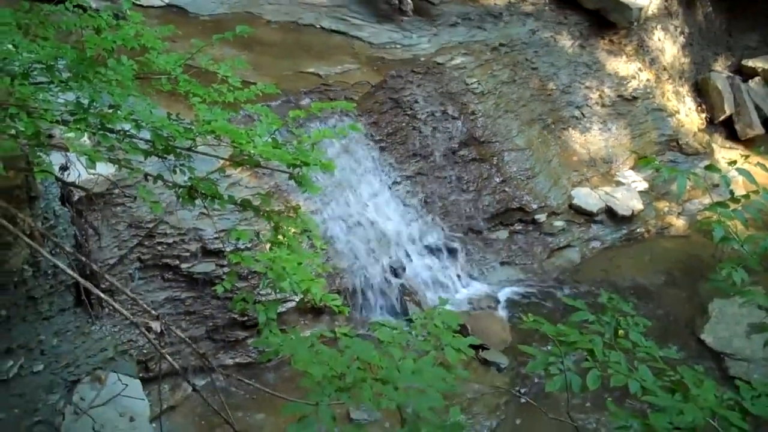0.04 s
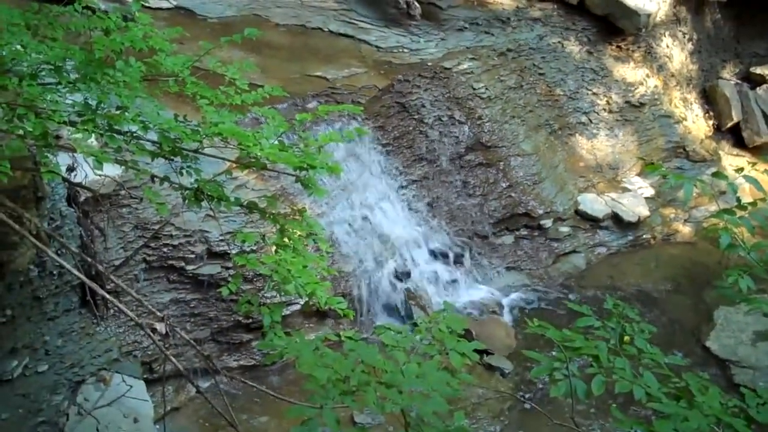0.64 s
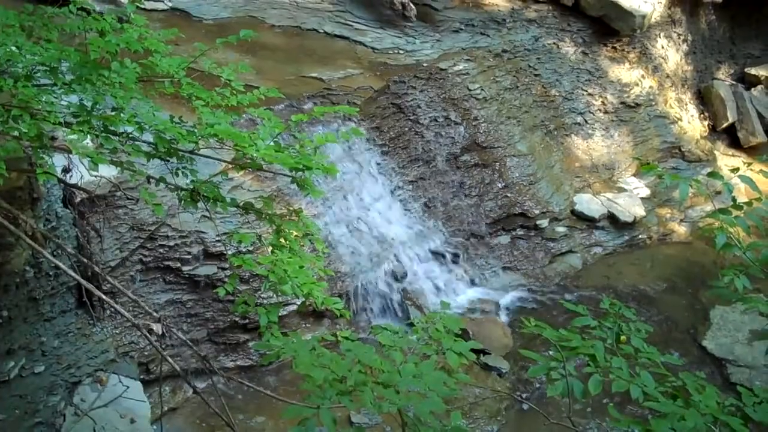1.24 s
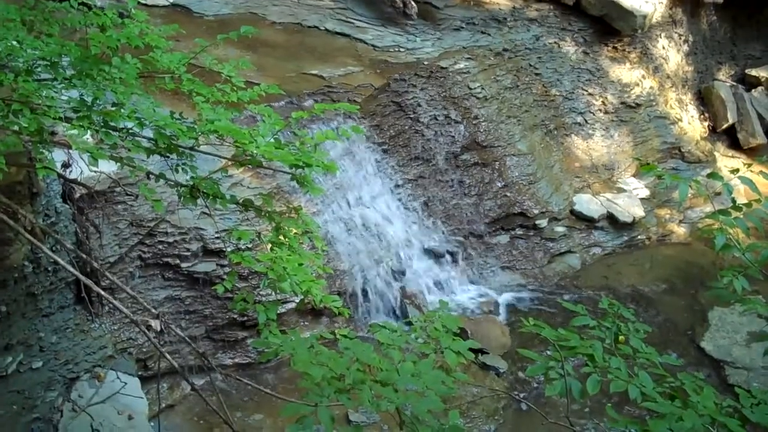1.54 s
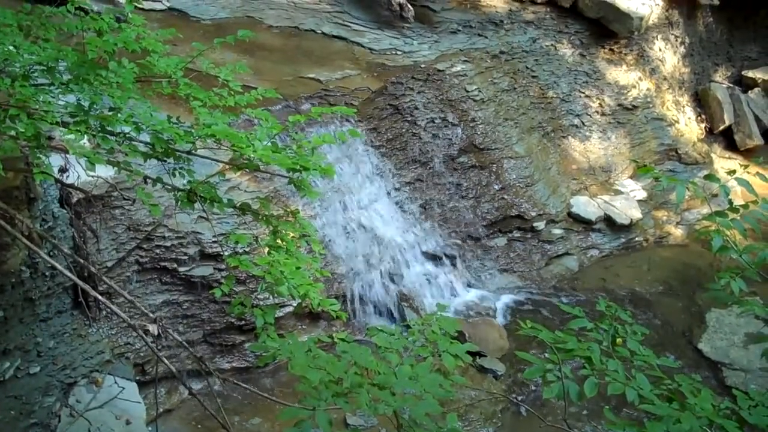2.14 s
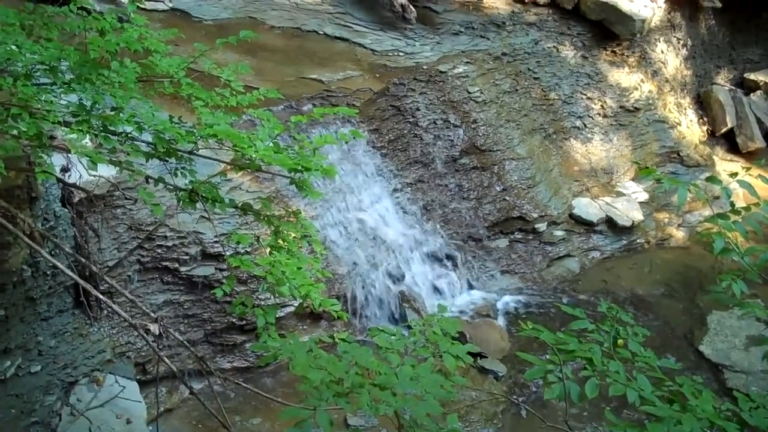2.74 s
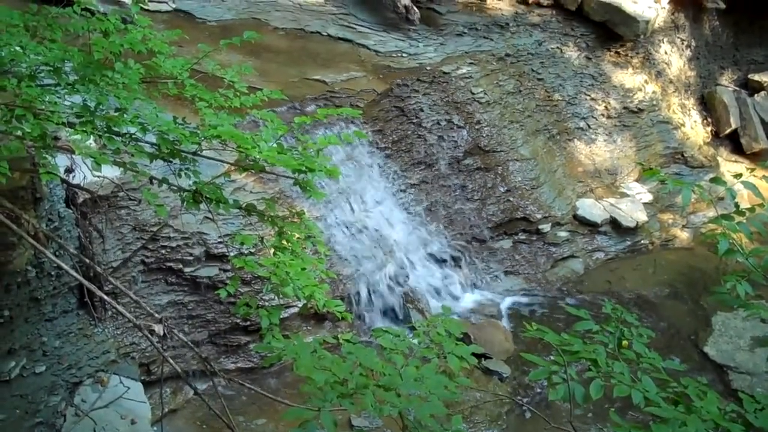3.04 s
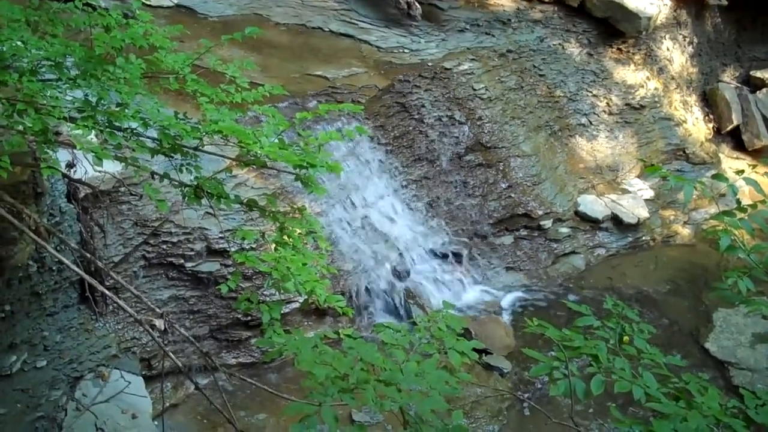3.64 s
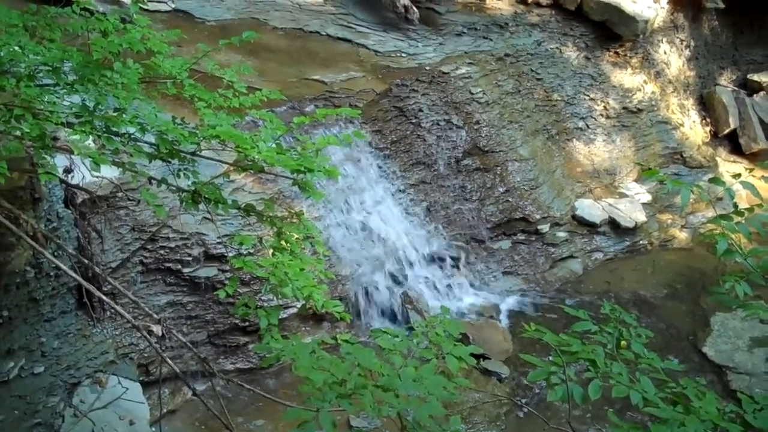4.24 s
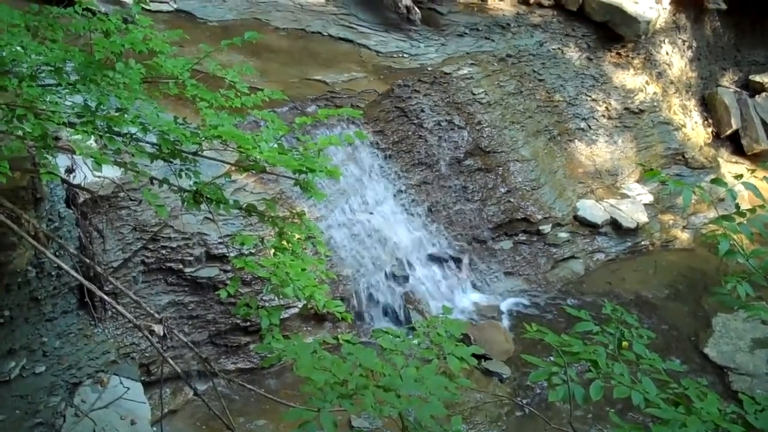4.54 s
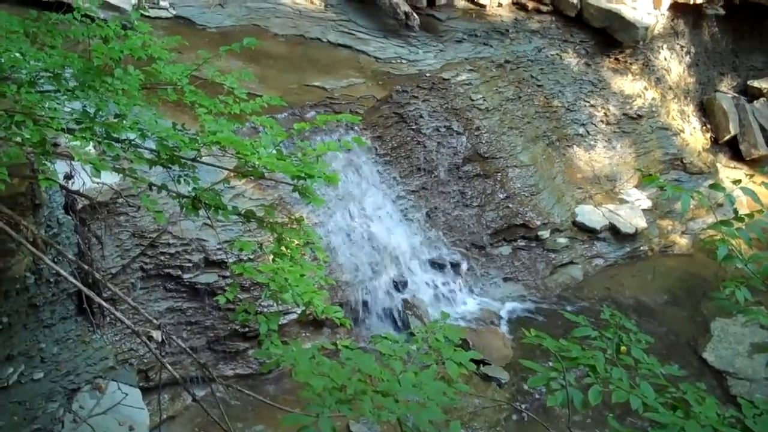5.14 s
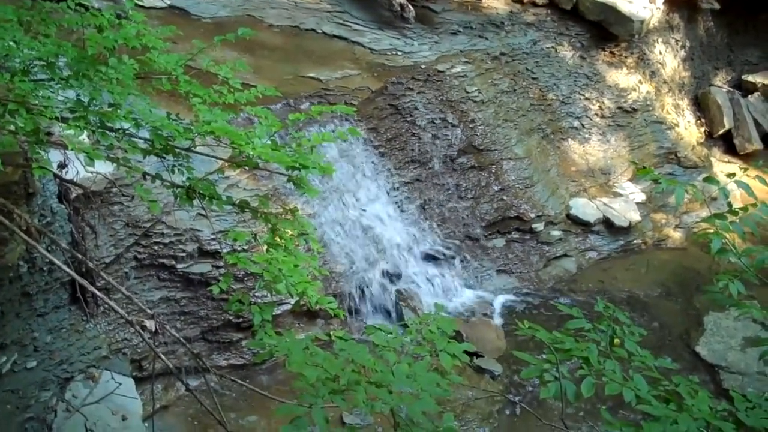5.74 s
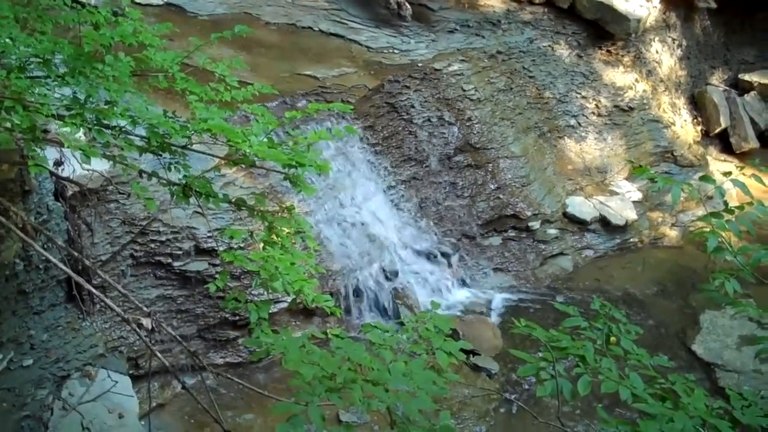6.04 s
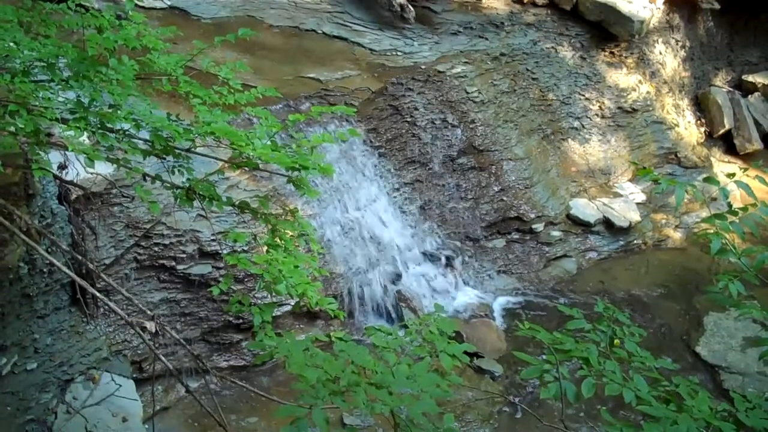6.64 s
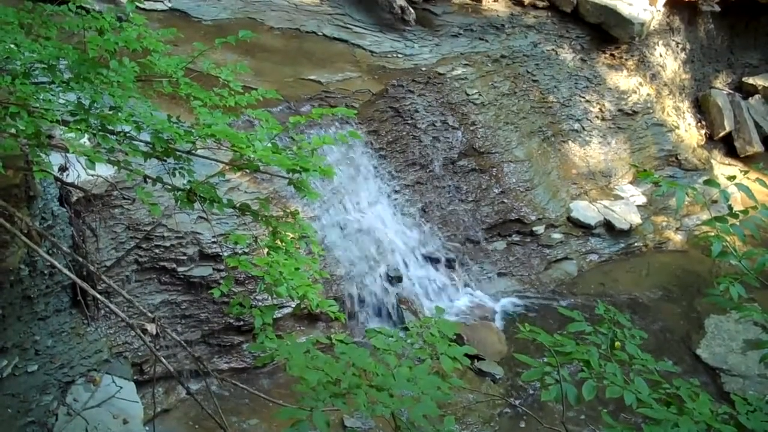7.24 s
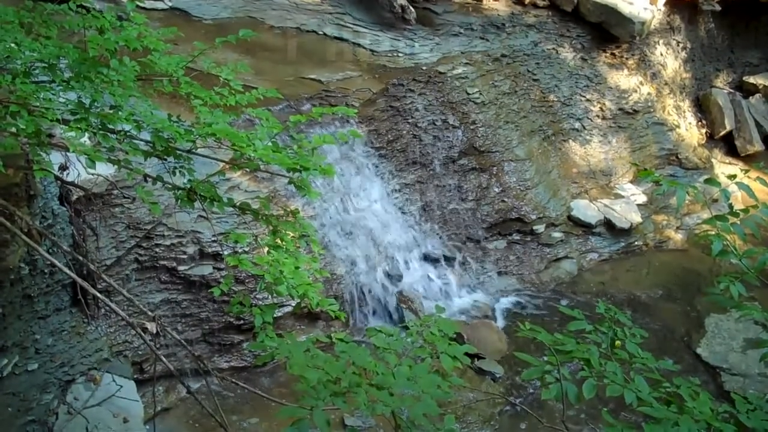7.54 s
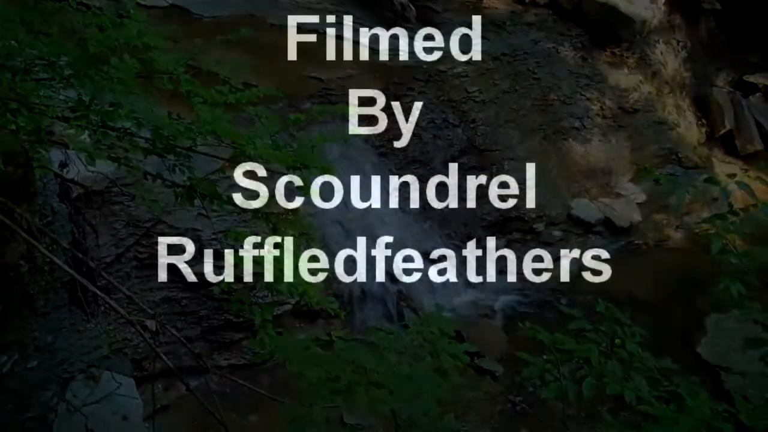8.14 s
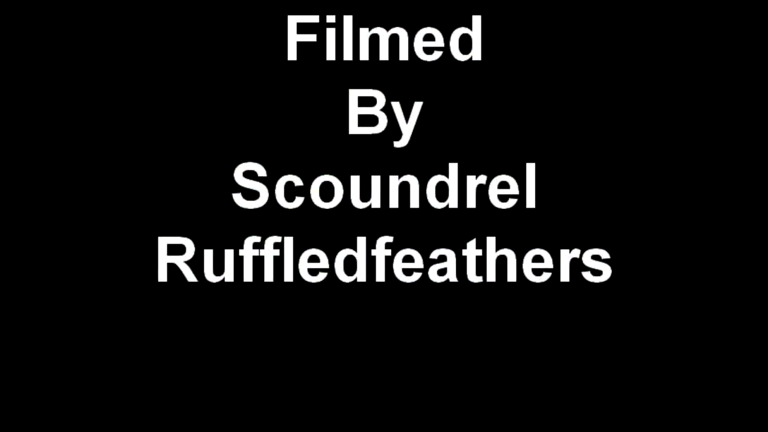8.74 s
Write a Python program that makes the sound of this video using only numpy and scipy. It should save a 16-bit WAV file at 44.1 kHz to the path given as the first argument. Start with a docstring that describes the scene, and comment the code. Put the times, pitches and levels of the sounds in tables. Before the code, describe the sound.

A small waterfall rushes and splashes steadily into a shallow pool, with light gurgles, then fades out.

```python
"""A small waterfall slides down rock ledges into a shallow pool in a forest gully.
From the start: a rush of bubbles and spray, coloured by a rock echo, over low air and faint hum.
Jet-trapped air gulps in the pool, loudest from 0.5 to 4 s; water slaps on stone from 0.7 to 6.8 s.
Two faint far drones pass from 5.7 to 8 s; everything fades out from 7.5 to 8.5 s.
Throughout, two small microphone ports ring in the treble."""
import sys
import numpy as np
from scipy import signal
from scipy.fft import rfft, irfft
from scipy.io import wavfile
from scipy.ndimage import uniform_filter1d

SR = 44100
rng = np.random.default_rng(int(sys.argv[2]) if len(sys.argv) > 2 else 0)


def wrap_up_sound(samples):
    """Save the sound to the file named by the first command line argument, as 16-bit audio."""
    columns = np.atleast_2d(samples).T
    # keep every value between -1 and 1, then stretch to whole-number steps
    tamed = np.clip(columns, -1, 1)
    steps = np.round(tamed * 32767).astype(np.int16)
    wavfile.write(sys.argv[1], SR, steps)


N = 396459
T = np.arange(N) / SR
HZ = np.fft.rfftfreq(N, 1 / SR)


def gain_of(db):
    """Decibels to amplitude."""
    return 10 ** (np.asarray(db) / 20)


def unit_rms(x):
    """Scale to rms 1."""
    return x / np.sqrt(np.mean(x ** 2) + 1e-20)


def curve(points, hz):
    """Interpolate a spectrum table over log frequency."""
    points_hz, values = np.transpose(points)
    return np.interp(np.log(hz + 1), np.log(points_hz + 1), values)


def filtered(x, response):
    """Apply a response given on the grid HZ."""
    return irfft(rfft(x) * response, N)


def add(mix, start_s, sound):
    """Mix a sound in at start_s."""
    part = mix[..., max(round(start_s * SR), 0):][..., :sound.shape[-1]]
    part += sound[..., :part.shape[-1]]


def wander(rate_hz):
    """Random drift of rms 1, up to about rate_hz."""
    return unit_rms(filtered(rng.standard_normal(N), 1 / (1 + (HZ / rate_hz) ** 2)))


def rush(spray_db, plunge_db=2.0, foam_db=0.87, surge_hz=17, patch_db=1.0, flicker_db=0.3):
    """Merged bubbles and drops: lows surge with the plunge, mids with the foam, treble with the spray."""
    # likeness at the two ports: (frequency [Hz], coherence [0..1])
    port_coherence = [(60, .9), (350, 1), (1300, 0.95), (2700, 1), (3400, 0.71), (5000, 0.64), (6000, 0.33),
                      (9000, 0.93), (10500, 0.22), (14000, .15)]
    frame, hop = 512, 128
    hz = np.fft.rfftfreq(frame, 1 / SR)
    t = np.arange(N // hop + 5) * hop / SR
    noise = rng.standard_normal((5, len(t), len(hz))).transpose(0, 2, 1)
    patches = uniform_filter1d(noise[4], size=9, axis=0)
    patches = unit_rms(uniform_filter1d(patches, size=4, axis=1))
    plunge = np.interp(t, T, plunge_db * wander(surge_hz))
    foam = np.interp(t, T, foam_db * wander(surge_hz))
    spray = np.interp(t, T, spray_db - flicker_db * wander(rate_hz=40))
    low_share = curve([(500, 0.65), (1000, 0)], hz)[:, None]
    high_share = curve([(3000, 0.27), (4800, 0.72)], hz)[:, None]
    mid_share = 1 - low_share - high_share
    swell_db = patch_db * patches + low_share * plunge + mid_share * foam + high_share * spray
    coherence = curve(port_coherence, hz)[:, None]
    left = noise[0] + 1j * noise[1]
    right = coherence * left + np.sqrt(1 - coherence ** 2) * (noise[2] + 1j * noise[3])
    spectra = np.array([left, right]) * gain_of(swell_db)
    _, pair = signal.istft(spectra, nperseg=frame, noverlap=frame - hop)
    return unit_rms(pair[:, :N])


def droplets(spray_db, base_per_s=3000, spread_db=1.3, clump_db=2.5):
    """Drops tick on the ledges in clumps, each with its own time gap between the ports."""
    chance = base_per_s / SR * gain_of(clump_db * wander(rate_hz=35) + 2 * spray_db)
    hits = (rng.random(N) < chance) * rng.choice([-1, 1], N)
    ticks = hits * gain_of(spread_db * np.minimum(rng.exponential(1, N), 4.5))
    gap_samples = rng.binomial(10, .5, N) - 5
    arrival = np.clip(np.arange(N) + gap_samples, 0, N - 1)
    pair = np.array([ticks, np.bincount(arrival, ticks, N)])
    tilt_db = curve([(500, -21.5), (2500, -0.5), (7000, 1.5)], HZ)
    return unit_rms(filtered(pair, gain_of(tilt_db)))


def bubble(hz, cycles, rise):
    """Trapped air rings down by 1/e in `cycles` periods; pitch rises as it nears the surface."""
    age = np.arange(0, 5, hz / (cycles * SR))  # in decay times
    ring = np.sin(2 * np.pi * cycles * (age + rise * age ** 2 / 2))
    return ring * np.exp(-age) * (1 - np.exp(-age * cycles))


def bubbles(low_hz=300, high_hz=8500, cycles_at_1khz=9, rise=.025, spread_db=1.5, count=18000):
    """Bubbles ring at the foot of the fall, each at its own pitch."""
    out = np.zeros((2, N))
    for when, smallness, luck, side in rng.random((count, 4)):
        hz = (np.sqrt(low_hz) + (np.sqrt(high_hz) - np.sqrt(low_hz)) * smallness) ** 2
        gain = np.sqrt(hz) * gain_of(spread_db * min(-np.log(1 - luck), 3.5))
        pan = (2.1 * side - 1.34) * hz / 7000  # short waves differ more between the ports
        ring = bubble(hz, cycles_at_1khz * np.sqrt(hz / 1000), rise)
        add(out, when * N / SR, gain * np.outer([1 + pan, 1 - pan], ring))
    return unit_rms(out)


def gulps(cycles=6, rise=0.017, lead_s=0.00604, low_hz=230, high_hz=750,
          low_db=-52, high_db=-39, spread_db=2.2, count=26):
    """Air pockets pushed under by the jet ring low; lesser ones come at random, the deepest faintest."""
    # largest pockets: (time [s], pitch [Hz], level [dB])
    air_pockets = [(.544, 744, -33), (.838, 890, -27.5), (1.102, 960, -32.5), (2.138, 680, -29.5),
                   (2.142, 386, -34.5), (2.402, 650, -31.5), (2.464, 470, -33.6), (2.634, 443, -33),
                   (2.84, 690, -31), (2.886, 1230, -25), (3.85, 694, -30.5), (3.948, 680, -33)]
    out = np.zeros(N)
    for time_s, hz, db in air_pockets:
        add(out, time_s - lead_s, gain_of(db) * bubble(hz, cycles, rise))
    for when, smallness, luck in rng.random((count, 3)):
        hz = low_hz * (high_hz / low_hz) ** smallness
        db = low_db + (high_db - low_db) * smallness + spread_db * (2 * luck - 1)
        add(out, when * N / SR, gain_of(db) * bubble(hz, cycles, rise))
    return out


def slaps(highpass_hz=5500):
    """Larger blobs of water burst on stone in short bright cracks."""
    # sharpest impacts: (time [s], level before filtering [dB], decay [s])
    impacts = [(.698, 11.5, .0006), (.742, 10, .001), (0.829, 17, 0.00086), (1.166, 16, 0.0012),
               (1.356, 13, 0.0011), (2.545, 9, .005), (4.058, 9.5, .0015), (4.967, 16, .0006),
               (5.567, 14.5, .0015), (6.766, 8, 0.0033)]
    out = np.zeros((2, N))
    t = T[:SR // 20]
    for time_s, db, decay_s in impacts:
        add(out, time_s, gain_of(db) * np.exp(-t / decay_s) * rng.choice([-1., 1.], (2, len(t))))
    return filtered(out, HZ / np.hypot(HZ, highpass_hz))


def rock_echo(delay_s=0.003605, phase_turns=0.38, strength=0.24, cutoff_hz=1550):
    """Response of one near reflection: ripples the low mids; rough rock scatters the treble."""
    bounce = np.exp(2j * np.pi * (phase_turns - HZ * delay_s))
    return 1 + strength / (1 + (HZ / cutoff_hz) ** 6) * bounce


def forest(air_db=-46.5, drone_halfwidth_hz=4):
    """Low stirring of air, independent at each port, and faint far drones."""
    # moving air: (frequency [Hz], relative density [dB])
    air_spectrum = [(10, -12.5), (35, -9.5), (70, 6), (110, -2), (160, -5.5), (400, 2), (2000, -38)]
    # far drones: (start [s], length [s], pitch [Hz], level [dB])
    drones = [(5.7, 1.35, 98, -68.5), (6.85, 1.1, 72, -68.5)]
    out = filtered(rng.standard_normal((2, N)), gain_of(air_db + curve(air_spectrum, HZ)))
    for start_s, length_s, hz, db in drones:
        band = 1 / (1 + ((HZ - hz) / drone_halfwidth_hz) ** 2)
        tone = unit_rms(filtered(rng.standard_normal(N), band))
        swell = np.sin(np.pi * np.clip((T - start_s) / length_s, 0, 1))
        out += gain_of(db) * tone * swell
    return out


def hum():
    """Faint steady recorder hum."""
    # harmonics: (frequency [Hz], rms level [dB])
    harmonics = [(142.4, -75), (284.8, -69)]
    return sum(gain_of(db) * np.sqrt(2) * np.sin(2 * np.pi * hz * T) for hz, db in harmonics)


def port(hz, width_hz, boost_db, loss):
    """Response of one microphone port: cavity resonance and treble loss."""
    stiffness, damping = hz ** 2 - HZ ** 2, 1j * HZ * width_hz
    resonance = (stiffness + gain_of(boost_db) * damping) / (stiffness + damping)
    return resonance * gain_of(curve(loss, HZ))


def scene(rush_db=-1.5, bubbles_db=-9, droplets_db=-4.5, water_db=-23.5):
    """Rush, bubbles, drops and slaps share the fall's colour and echo; gulps and forest add directly."""
    # colour of the falling water: (frequency [Hz], relative gain [dB])
    water_spectrum = [(30, -27), (100, -33.5), (170, -21), (230, -12.5), (310, -14), (390, -9.5), (520, -7),
                      (700, -4), (1300, -3), (1900, -.5), (3000, -1.03), (4500, -2), (7000, -1.5),
                      (14000, -4)]
    spray_db = 0.5 * wander(rate_hz=16)  # drives both hiss and drop rate
    water = gain_of(rush_db) * rush(spray_db)
    water += gain_of(bubbles_db) * bubbles()
    water += gain_of(droplets_db) * droplets(spray_db)
    water += slaps()
    colour = gain_of(water_db + curve(water_spectrum, HZ))
    return filtered(water, colour * rock_echo()) + gulps() + forest()


def record(dry, left_lag_ms=0.017, fade_start_s=7.52, fade_end_s=8.533, cutoff_hz=14250):
    """Two microphone ports, hum, closing fade, band limit."""
    # port cavities, left then right: (resonance [Hz], width [Hz], boost [dB])
    cavities = [(7320, 1150, 11), (6270, 870, 10.5)]
    # treble loss of each port: (frequency [Hz], gain [dB])
    left_loss = [(3000, 0.5), (5600, 0.5), (7200, 0), (8500, -4), (10000, -7.5), (12000, -10.5),
                 (14000, -9.5)]
    right_loss = [(3000, -0.08), (5200, 0.5), (6400, -2.1), (7400, -6), (8400, -10.5), (9300, -11),
                  (10500, -20), (12000, -25), (14000, -35)]
    left = port(*cavities[0], left_loss) * np.exp(-2j * np.pi * HZ * left_lag_ms / 1000)
    right = port(*cavities[1], right_loss)
    heard = filtered(dry, np.array([left, right])) + hum()
    fade = np.clip((fade_end_s - T) / (fade_end_s - fade_start_s), 0, 1)
    low_pass = signal.firwin(801, cutoff_hz, window=("kaiser", 9), fs=SR)
    return signal.oaconvolve(heard * fade, low_pass[None], "same")


dry = scene()
out = record(dry)
wrap_up_sound(out)
```